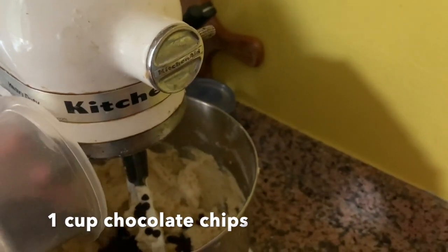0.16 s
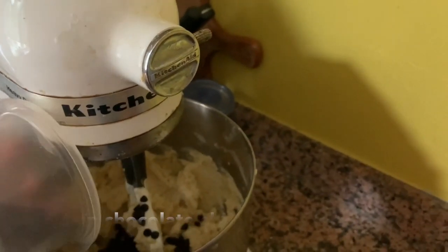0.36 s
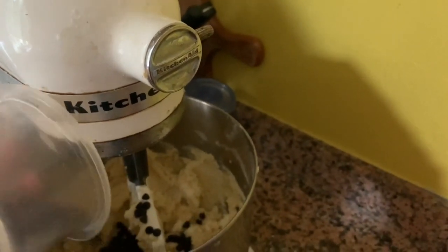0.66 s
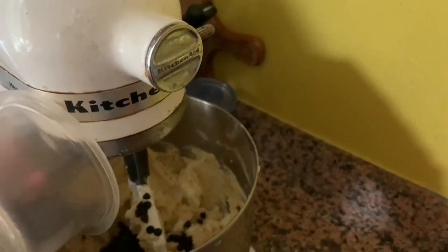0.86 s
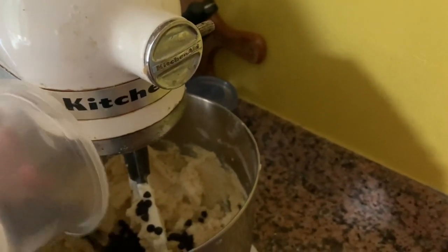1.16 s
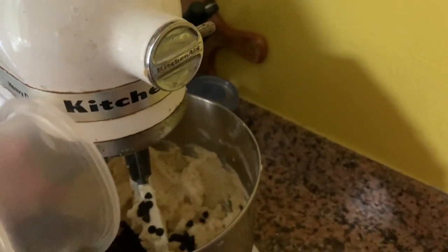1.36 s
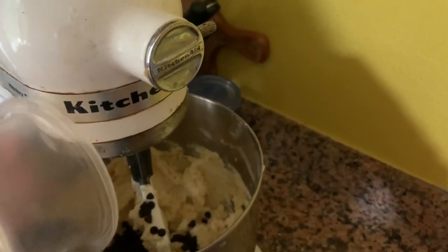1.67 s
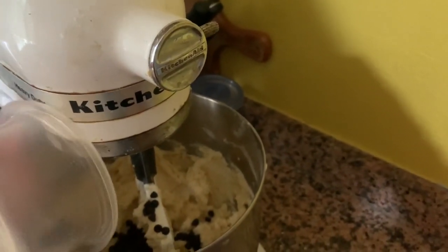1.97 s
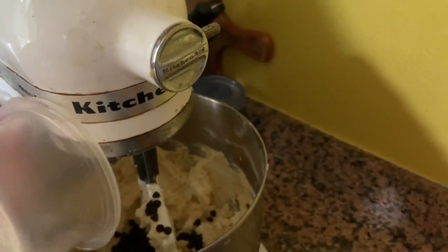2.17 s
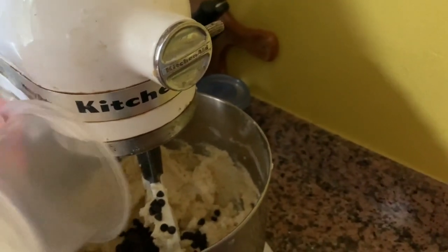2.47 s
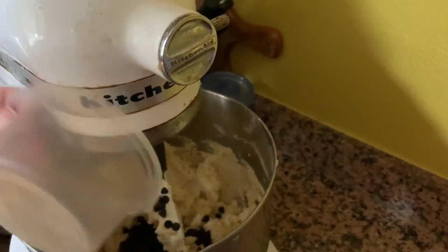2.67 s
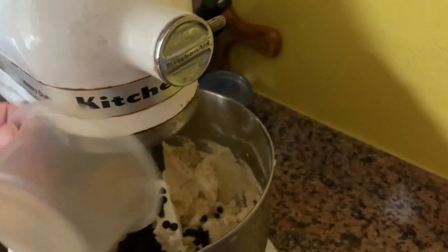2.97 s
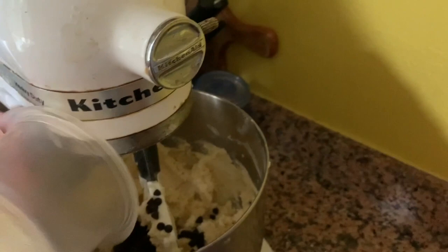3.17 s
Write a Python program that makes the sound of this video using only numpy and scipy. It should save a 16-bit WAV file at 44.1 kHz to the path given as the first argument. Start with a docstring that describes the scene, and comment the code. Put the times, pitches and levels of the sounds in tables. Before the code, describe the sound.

A dry, bright rattle of small chips pouring out of plastic and pattering dully into dough, then uneven plastic scrapes and hollow knocks on a metal bowl, recorded close in a small kitchen.

```python
"""Chocolate chips poured into dough

Chips slide from a plastic tub into dough in a steel mixing bowl, close to the microphone in a kitchen.
Rustle and patter are coloured noise under random contact envelopes; clicks and clacks are brief pitches.
The bowl rings faintly as a bank of decaying modes. Then the tub is shaken empty: it scrapes (jerky noise)
and knocks (noise cracks and struck modes) against the bowl and the mixer, over a quiet noise background."""
import sys
import numpy as np
from scipy import signal
from scipy.fft import rfft, irfft
from scipy.io import wavfile
from scipy.ndimage import uniform_filter1d, map_coordinates

SR = 44100
rng = np.random.default_rng(int(sys.argv[2]) if len(sys.argv) > 2 else 0)


def pcm_store(signal):
    """Save signal as 16-bit PCM."""
    levels = np.round(np.clip(np.atleast_2d(signal), -1, 1) * 32767)
    wavfile.write(sys.argv[1], SR, levels.astype(np.int16).T)


N = 145530
T = np.arange(N) / SR

# All dB are relative levels, before the gains set below.
# Pour flow: [t/s, rustle level/dB, treble level/dB]
POUR_FLOW = [(0, -44, -45), (.24, -43, -48), (.48, -44.5, -48), (.56, -37.5, -42.5), (.63, -43, -47.5),
             (.71, -42.5, -41), (.77, -50, -45.5), (.84, -37.5, -42.5), (.98, -48, -43.5),
             (1.09, -35, -42.5), (1.135, -48, -45.5), (1.18, -39, -43.5), (1.31, -40, -41),
             (1.365, -32.5, -39.5), (1.45, -44.5, -45), (1.83, -40.5, -45.5), (1.94, -50, -50),
             (2.06, -45, -51), (2.13, -56.5, -59), (2.24, -61, -67)]
# Chips landing in the dough: [t/s, level/dB]
LANDING_FLOW = [(0.0, -72), (0.04, -79), (1.0, -72), (1.1, -48.5), (1.32, -61), (1.35, -49.5), (1.47, -67),
                (1.52, -48.5), (1.56, -73), (1.62, -52), (1.96, -55), (2.01, -78), (2.03, -49.5),
                (2.11, -46.5), (2.2, -67), (2.24, -48)]
# Single chips clicking on the tub: [t/s, body level/dB, treble level/dB]
CHIP_CLICKS = [(0.0094, -27, -34), (0.0503, -28, -36), (0.0946, -23.5, -33.5), (0.135, -44, -38),
               (0.18, -21, -58), (0.2591, -21, -55), (0.3057, -20.5, -34), (0.309, -30, -33),
               (0.316, -49, -36), (0.3669, -21.5, -31.5), (0.4287, -23.5, -48), (0.4636, -26, -61),
               (0.509, -36, -34.5), (0.526, -24, -62), (0.653, -21, -38), (0.6706, -21, -37),
               (0.7165, -24, -33), (0.784, -36, -32.5), (0.798, -23, -33.5), (0.842, -21, -46),
               (0.8503, -47, -45), (0.9225, -19, -30), (0.9732, -27, -52), (1.027, -27.5, -52),
               (1.16, -17, -32), (1.1833, -21, -37), (1.295, -49, -37), (1.3502, -19, -30),
               (1.5809, -22.5, -43), (1.5967, -20.5, -58), (1.6795, -22, -46), (1.8057, -24, -34),
               (1.9022, -23.5, -39), (1.927, -25, -35), (1.9572, -25.5, -33.5), (1.9718, -25, -37),
               (2.033, -59, -38.5), (2.0649, -27.5, -42), (2.0862, -54, -38.5), (2.145, -41, -42.5),
               (2.1556, -34.5, -38), (2.1985, -45, -41)]
# Clumps of chips dropping into the dough: [t/s, level/dB]
CLUMP_DROPS = [(1.07, -40), (1.147, -39), (1.34, -40), (1.662, -44), (1.793, -41.5), (1.906, -45.5),
               (2.093, -36)]
# Tub dragging over the rim: [peak t/s, swell/s, fade/s, level/dB, treble level/dB]
RIM_SCRAPES = [(2.29, 0.027, 0.011, -38, -48.5), (2.375, 0.014, 0.022, -33.5, -49),
               (2.623, 0.024, 0.0095, -45.5, -67), (2.673, 0.0079, 0.009, -33, -59),
               (2.695, 0.022, 0.012, -34, -35), (2.769, 0.035, 0.0093, -39.5, -40.5),
               (2.82, 0.011, 0.028, -31, -39.5), (2.938, 0.0063, 0.013, -40, -45),
               (3.025, 0.094, 0.079, -52.5, -62), (3.066, 0.0098, 0.0062, -40, -45),
               (3.19, 0.015, 0.019, -41, -47.5), (3.3, 0.043, .02, -52, -70)]
# Tub hitting the bowl: [t/s, thud/dB, clunk/dB, bowl ring/dB, crack/dB, bright tick/dB]
TUB_KNOCKS = [(2.2901, -36.5, -36.5, -32.5, -34.5, -52), (2.3643, -40.5, -30.5, -27, -21.5, -34),
              (2.375, -43, -47, -59, -27.5, -32), (2.469, -58, -48, -47, -42, -72),
              (2.6227, -33.5, -41, -37.5, -59, -40), (2.670, -54, -35, -24.5, -27.5, -48),
              (2.692, -28, -33, -31.5, -21, -19), (2.753, -56, -50, -31, -46, -48),
              (2.776, -46, -37, -33.5, -28, -58), (2.8144, -34, -37, -28.5, -35, -48),
              (2.8327, -21, -15.5, -36, -16, -22), (2.937, -30.5, -38, -48, -34, -25.5),
              (3.021, -48, -57, -45.5, -55, -60), (3.059, -33, -40, -56, -32, -40),
              (3.1866, -40, -40, -50, -27, -29)]
# Rumble of the shaken tub in the hand: [t/s, level/dB]
HANDLING_FLOW = [(0, -99), (2.6, -60), (2.72, -46.5), (3.0, -47.5), (3.14, -51.5), (3.3, -51.5)]

# Steel bowl modes: [f/Hz, level when knocked/dB, level under chips/dB, t60/s, left-right/dB]
BOWL_MODES = [(315.2, -9, 11, 0.042, 4), (349.7, 6.5, -2.5, 0.1, -6.5), (386.6, 1, -16.5, 0.17, -1),
              (457.4, -5.5, 1, 0.16, 10), (1022.7, 1, 11, 0.087, 12.5), (1110, -2, 2.5, 0.078, -3),
              (1297, -14, -18.5, 0.06, 8), (1362, -1.5, 3.5, 0.049, 4), (1863, -17.5, -4, 0.062, -41),
              (2290, -5, -49, 0.062, 7), (2600, -8.5, -20, 0.13, -5), (2823, -12.5, -24, 0.26, -3),
              (2866, -45, -20, 0.59, 4), (2840, -18, -11.5, 0.087, -4)]
# Hollow thud of the tub and sway of the mixer: [f/Hz, level/dB, t60/s, left-right/dB]
THUD_MODES = [(73, -10, 0.14, 1), (125, -15, 0.032, 10), (163, 1, 0.028, 5), (160.8, -25.5, 0.6, -9),
              (219, -10, 0.033, 17.5), (340, 2.5, 0.04, -4.5)]
# Clunk of the bowl in its seat: [f/Hz, level/dB, t60/s, left-right/dB]
CLUNK_MODES = [(365, -17, 0.15, -8), (483, -1, 0.057, 8.5), (455.6, -18, 0.34, 8), (586, -6, 0.025, 11.5),
               (656, -5.5, 0.028, 2), (830, -11, 0.027, 9)]
# Dough-damped bowl under a clump: [f/Hz, level/dB, t60/s, left-right/dB]
PLOP_MODES = [(84, -12.5, 0.08, -4), (140, -10.5, 0.039, -2), (211, -12.5, 0.037, 0), (302, -10, 0.03, -1),
              (348.4, 1.5, 0.057, -6.5)]
# Chip on plastic and steel: [mean f/Hz, chip-to-chip spread as share of f, level/dB, t60/s]
CLACK_MODES = [(1066, 0.043, -7, 0.029), (1367, .045, -10.5, 0.029), (2076, 0.042, -3.5, 0.033),
               (2492, .06, -0.5, 0.018), (2943, 0.033, -0.5, 0.046), (3668, 0.056, -9, 0.066),
               (4280, 0.047, -11.5, 0.059), (5394, 0.1095, 0, 0.054), (6980, 0.072, -6.5, 0.022),
               (10840, 0.153, -12.5, 0.004)]

# Rustle spectrum: [f/Hz, power density/dB]
RUSTLE_SPECTRUM = [(100, -34), (400, -8.5), (750, -24), (1080, -8.5), (1550, -8.5), (2000, -6), (2300, 0),
                   (2950, -1), (3400, -5.5), (4200, -3.5), (5000, -9), (5700, -8), (7100, -15.5),
                   (16000, -51)]
# Rustle treble spectrum: [f/Hz, power density/dB]
TREBLE_SPECTRUM = [(1000, -16), (4000, -8.5), (7500, -1.5), (11000, -0.5), (16000, -0.5)]
# Dough patter spectrum: [f/Hz, power density/dB]
DOUGH_SPECTRUM = [(25, -25), (45, 12), (72, 7), (105, 11), (160, -5), (240, -3.5), (340, 20.5), (460, 6.5),
                  (650, -3), (1500, -60), (5000, -19)]
# Plastic crack and scrape spectrum: [f/Hz, power density/dB]
CRACK_SPECTRUM = [(100, -7), (400, 3.5), (800, -5), (1100, 1), (1650, -9), (2300, 0.5), (3300, -9),
                  (4200, -5.5), (7000, -14), (12000, -42)]
# Bright tick and scrape treble spectrum: [f/Hz, power density/dB]
TICK_SPECTRUM = [(1000, -45), (4000, -2.5), (7000, 5.5), (11000, 4), (16000, -3)]
# Handling rumble spectrum: [f/Hz, power density/dB]
RUMBLE_SPECTRUM = [(30, 1), (68, -0.5), (105, -6), (160, -4), (250, -5), (350, 5), (550, -34), (1500, -45)]
# Kitchen background spectrum: [f/Hz, power density/dB]
HUSH_SPECTRUM = [(30, 0.5), (75, 5.5), (130, -8.5), (250, 1), (400, -6.5), (650, -13), (1000, -13),
                 (1700, -13), (2800, -12), (6000, -42), (16000, -55)]

# Mean contact rates, strength scatter, amplitude 1/e decays
CHIPS_PER_S, CHIP_SCATTER_DB, CHIP_DECAY_S, BUNCH_DB = 820, 2, 0.002, 2.5
LANDINGS_PER_S, LANDING_DECAY_S = 87, 0.0052
CLACKS_PER_S, CLACK_SCATTER_DB, CLACK_COLOUR_DB = 330, 4, 4.5
CLICK_DECAY_S, CRACK_DECAY_S, TICK_DECAY_S = 0.0028, 0.0035, 0.0016
THUD_RISE_CYCLES, CLUNK_RISE_CYCLES, RING_RISE_CYCLES = 1.08, 0.33, 0.24

# Gains
RUSTLE_DB, RUSTLE_TREBLE_DB, CLACK_DB, LANDING_DB, POUR_RING_DB = -2.5, 3.5, -1.5, 0.5, -10
CLICK_DB, CLICK_TREBLE_DB, CLICK_CLACK_DB = -9.5, 2, 11
CLUMP_DB, SCRAPE_RING_DB, CRUMBS_DB, HUSH_DB = -3, -11, -62.52, -58.5
THUD_DB, CLUNK_DB, RING_DB, CRACK_DB, TICK_DB = -0.5, -0.5, -8.02, -6, -1.5

# Room and stereo paths; shares are of power
ROOM_T60_S, ROOM_TREBLE_T60_S = 0.3, 0.035
POUR_ROOM_DB, KNOCK_ROOM_DB, THUD_ROOM_DB = -11.02, -11.02, -14.52
RIGHT_LAG_S, SCATTER_SHARE = 12 / SR, 0.37
LIP_LAG_S, LIP_SCATTER_SHARE = 0.0001811, 0.023
LOW_CUT_HZ, TOP_HZ = 75, 15800


def pour():
    """Chips jostle and click along the tub, then land in the dough and set the bowl ringing."""
    chips = unit(bursts(shower(CHIPS_PER_S, CHIP_SCATTER_DB), CHIP_DECAY_S))
    fine = unit(bursts(shower(per_s=860, scatter_db=3), decay_s=0.0024))
    flow, treble_flow = curve(POUR_FLOW, axis=1), curve(POUR_FLOW, axis=2)
    at, body_db, treble_db = np.array(CHIP_CLICKS).T

    body_clicks = bursts(blows(at, undb(body_db + CLICK_DB)), CLICK_DECAY_S)
    body = np.hypot(chips * flow * undb(RUSTLE_DB), body_clicks)

    treble_clicks = bursts(blows(at, undb(treble_db + CLICK_TREBLE_DB)), decay_s=0.0057)
    fizz = unit(np.hypot(chips, fine)) * treble_flow * undb(RUSTLE_TREBLE_DB)
    treble = np.hypot(fizz, treble_clicks)

    clack_hits = shower(CLACKS_PER_S, CLACK_SCATTER_DB) * flow * undb(CLACK_DB)
    clatter = clacks(clack_hits + blows(at, undb(body_db + CLICK_CLACK_DB)))
    ring = bowl(body, column=2) * undb(POUR_RING_DB)
    slide = from_tub(body, RUSTLE_SPECTRUM) + from_lip(treble, TREBLE_SPECTRUM)
    return kitchen(slide + clatter + landings() + ring, POUR_ROOM_DB)


def landings():
    """Chips patter into the dough: short bursts of dull noise."""
    patter = unit(bursts(shower(LANDINGS_PER_S, scatter_db=4.5), LANDING_DECAY_S))
    return from_tub(patter * curve(LANDING_FLOW, axis=1) * undb(LANDING_DB), DOUGH_SPECTRUM)


def clumps():
    """Chips that fall together land with one soft bump."""
    at, db = np.array(CLUMP_DROPS).T
    plop = modes(*np.array(PLOP_MODES).T, THUD_RISE_CYCLES)
    return kitchen(convolve(blows(at, undb(db + CLUMP_DB)), plop), THUD_ROOM_DB)


def scrapes():
    """The plastic catches and slips on the rim in dense small jerks, which also ring the bowl."""
    jerks = unit(bursts(shower(per_s=880, scatter_db=1), decay_s=0.0026))
    body, treble = 0, 0
    for at, swell_s, fade_s, db, treble_db in RIM_SCRAPES:
        push = np.exp(-np.maximum((at - T) / swell_s, (T - at) / fade_s))
        body = body + push * undb(db)
        treble = treble + push * undb(treble_db)
    ring = bowl(jerks * body, column=1) * undb(SCRAPE_RING_DB)
    rub = from_tub(jerks * body, CRACK_SPECTRUM) + from_lip(jerks * treble, TICK_SPECTRUM)
    return kitchen(rub + ring, KNOCK_ROOM_DB)


def knocks():
    """Each knock is a plastic crack, a hollow thud, a clunk and a short ring of the dough-damped bowl."""
    at, thud_db, clunk_db, ring_db, crack_db, tick_db = np.array(TUB_KNOCKS).T
    thud_modes = modes(*np.array(THUD_MODES).T, THUD_RISE_CYCLES)
    clunk_modes = modes(*np.array(CLUNK_MODES).T, CLUNK_RISE_CYCLES)
    thud = convolve(blows(at, undb(thud_db + THUD_DB)), thud_modes)
    clunk = convolve(blows(at, undb(clunk_db + CLUNK_DB)), clunk_modes)
    ring = convolve(blows(at, undb(ring_db + RING_DB)), bowl_ring(column=1))
    crack = from_tub(bursts(blows(at, undb(crack_db + CRACK_DB)), CRACK_DECAY_S), CRACK_SPECTRUM)
    tick = from_lip(bursts(blows(at, undb(tick_db + TICK_DB)), TICK_DECAY_S), TICK_SPECTRUM)
    return kitchen(thud + clunk + ring, THUD_ROOM_DB) + kitchen(crack + tick, KNOCK_ROOM_DB)


def handling():
    """The tub shifts in the hand as it is shaken: small dull bumps at uneven times."""
    bumps = unit(bursts(shower(per_s=45, scatter_db=0.5), decay_s=0.027))
    rumble = bumps * curve(HANDLING_FLOW, axis=1) * rng.standard_normal(N)
    return pan(colour(rumble, RUMBLE_SPECTRUM), pan_db=1.5)


def crumbs():
    """Crumbs left in the shaken tub tick faintly, from the knock with the strongest clunk on."""
    start_s = max(TUB_KNOCKS, key=lambda knock: knock[2])[0]
    ticks = clacks(shower(per_s=160, scatter_db=4) * (T > start_s))
    # colour() returns the left channel only, so the ticks sit in the middle
    ticks = colour(ticks, [(1500, -17), (2600, -2), (4000, -2.5), (9000, -10.5)])
    return kitchen(undb(CRUMBS_DB) * ticks, POUR_ROOM_DB)


def hush():
    """Quiet background of the kitchen: steady noise, partly shared by both channels."""
    shared, left, right = (colour(noise, HUSH_SPECTRUM) for noise in rng.standard_normal((3, N)))
    return undb(HUSH_DB) * (shared + 0.32 * np.array([left, right]))


def clacks(hits, size=1024, order=64):
    """Every chip strikes a different spot, so it rings briefly with pitches and strengths of its own."""
    hz, spread, db, t60 = np.array(CLACK_MODES).T
    out, t = np.zeros(N + size), T[:size]
    # one draw per block of `order` samples
    detune, strength = np.clip(rng.standard_normal((2, N // order + 1, len(hz))), -2, 2)
    fade = undb(-60 * t / t60[:, None]) / np.sqrt(t60[:, None])
    signs = (-1) ** np.arange(len(hz))
    for i in np.flatnonzero(hits > undb(-70)):
        pitch = hz * (1 + spread * detune[i // order])
        gain = signs * undb(db + CLACK_COLOUR_DB * strength[i // order])
        ring = gain @ (fade * np.sin(2 * np.pi * np.outer(pitch, t)))
        out[i:i + size] += hits[i] * unit(ring) / np.sqrt(size)
    return ports(out[:N])


def bowl(envelope, column):
    """Small contacts all round the bowl keep its modes ringing, a little differently at each port."""
    noise, ring = rng.standard_normal((3, N)), bowl_ring(column)
    return convolve(envelope * (noise[0] + 0.5 * noise[1:]), unit(ring) / np.sqrt(ring.shape[1]))


def bowl_ring(column):
    """The bowl's modes, at the strengths in one column of their table."""
    table = np.array(BOWL_MODES).T
    return modes(table[0], table[column], table[3], table[4], RING_RISE_CYCLES)


def modes(hz, db, t60, pan_db, rise_cycles):
    """Ring of an object after one blow, at both ports; low modes take longer to build up."""
    t, out = T[:SR // 2], 0
    for k, (f, d, s, lean) in enumerate(zip(hz, db, t60, pan_db)):
        swing = (1 - np.exp(-t * f / rise_cycles)) ** 2 * undb(-60 * t / s)
        tone = swing / swing.max() * np.sin(2 * np.pi * f * t)
        out = out + pan((-1) ** k * undb(d) * tone, lean)
    return out


def shower(per_s, scatter_db, size=4000):
    """Random contacts of uneven strength that come in bunches, at a steady mean power."""
    smooth = uniform_filter1d(rng.standard_normal(N), size // 10)
    bunch = unit(uniform_filter1d(smooth, size // 10))
    scatter = np.clip(rng.standard_normal(N), -2, 2)
    hits = (rng.random(N) < per_s / SR) * undb(scatter_db * scatter + BUNCH_DB * bunch)
    return hits / np.sqrt(np.abs(uniform_filter1d(hits ** 2, size)) + 1e-9)


def blows(times, gains):
    """One impulse for each contact."""
    out = np.zeros(N)
    np.add.at(out, np.clip((np.asarray(times) * SR).astype(int), 0, N - 1), gains)
    return out


def bursts(hits, decay_s):
    """Every contact radiates briefly; powers add to give the summed envelope."""
    return np.sqrt(signal.lfilter([1], [1, -np.exp(-2 / (decay_s * SR))], hits ** 2))


def from_tub(envelope, points):
    """Contact noise arrives directly, and at both ports again off the nearby steel."""
    direct, left, right = (colour(envelope * noise, points) for noise in rng.standard_normal((3, N)))
    scattered = np.array([left, right])
    return np.sqrt(1 - SCATTER_SHARE) * ports(direct) + np.sqrt(SCATTER_SHARE) * scattered


def from_lip(envelope, points):
    """Fine contact noise at the tub's lip, which lies nearer the middle between the ports."""
    direct, left, right = (colour(envelope * noise, points) for noise in rng.standard_normal((3, N)))
    late = map_coordinates(direct, [(T - LIP_LAG_S) * SR])
    scattered = np.array([left, right])
    return np.sqrt(1 - LIP_SCATTER_SHARE) * np.array([direct, late]) + np.sqrt(LIP_SCATTER_SHARE) * scattered


def ports(x):
    """A sound from the tub reaches the left port first."""
    return np.array([x, np.interp(T - RIGHT_LAG_S, T, x)])


def pan(x, pan_db):
    """Lean a sound to the left; a negative value leans it right."""
    return x * undb(np.array([[pan_db], [-pan_db]]) / 2)


def kitchen(x, room_db):
    """Add the room's tail, different at each port and shorter in the treble."""
    t, noise = T[:SR], rng.standard_normal((2, SR))
    low = signal.sosfilt(signal.butter(2, 4500, fs=SR, output="sos"), noise)
    tail = low * undb(-60 * t / ROOM_T60_S) + 2.33 * noise * undb(-60 * t / ROOM_TREBLE_T60_S)
    tail = tail * (1 - np.exp(-t / 0.0009))  # soft onset
    return x + undb(room_db) * convolve(x, unit(tail) / np.sqrt(SR))


def colour(x, points, size=4096):
    """Minimum-phase filter through (f/Hz, level/dB) points that keeps the power of white noise."""
    hz, db = np.array(points, float).T
    f = np.maximum(np.fft.rfftfreq(size, 1 / SR), 1)
    gain = unit(undb(np.interp(np.log(f), np.log(hz), db)))
    cepstrum = irfft(np.log(gain))
    # fold the cepstrum to make the response causal
    cepstrum[1:size // 2] *= 2
    cepstrum[size // 2 + 1:] = 0
    return convolve(x, irfft(np.exp(rfft(cepstrum))))[0]


def curve(rows, axis):
    """Gain along one column of a level curve; falls 85 dB/s after the last point."""
    rows = np.array(rows)
    level_db = np.interp(T, rows[:, 0], rows[:, axis])
    return undb(level_db - 85 * np.maximum(T - rows[-1, 0], 0))


def convolve(x, response):
    """Pass a sound through one response, or one for each channel."""
    return signal.fftconvolve(np.atleast_2d(x), np.atleast_2d(response), axes=1)[:, :N]


def unit(x):
    """Scale to rms 1."""
    return x / np.sqrt(np.mean(x ** 2))


def undb(db):
    """Decibels to gain."""
    return 10 ** (np.asarray(db) / 20)


def scene():
    """The pour, then the shaking out of the tub."""
    return pour() + clumps() + scrapes() + knocks() + handling() + crumbs() + hush()


def record(dry):
    """The recorder thins the deep bass and cuts the top."""
    thinned = signal.sosfilt(signal.butter(2, LOW_CUT_HZ, "high", fs=SR, output="sos"), dry)
    return signal.sosfilt(signal.ellip(10, 0.2, 70, TOP_HZ, fs=SR, output="sos"), thinned)


dry = scene()
out = record(dry)
pcm_store(out)
```